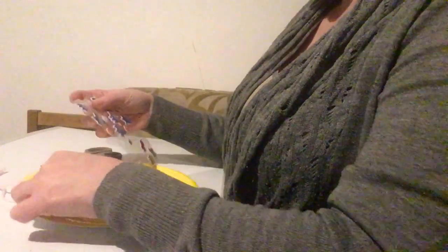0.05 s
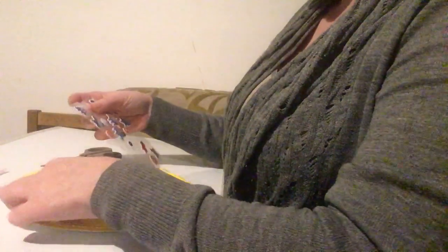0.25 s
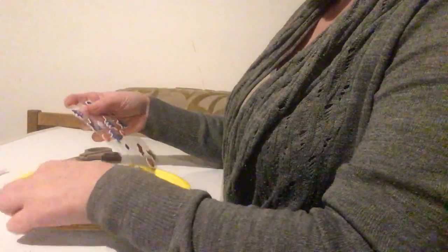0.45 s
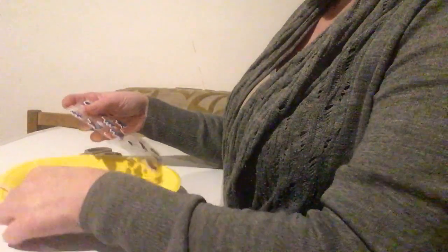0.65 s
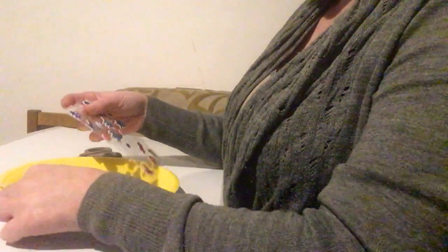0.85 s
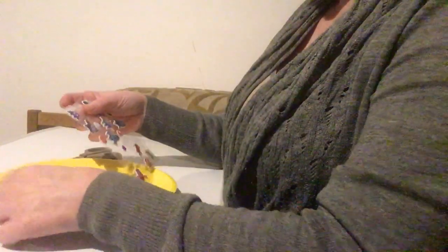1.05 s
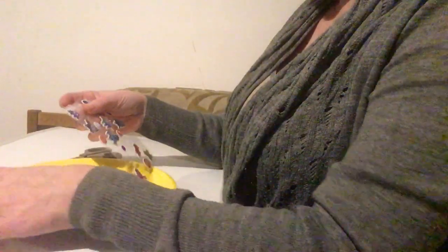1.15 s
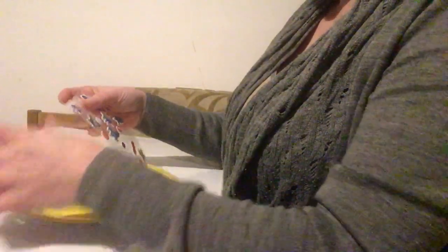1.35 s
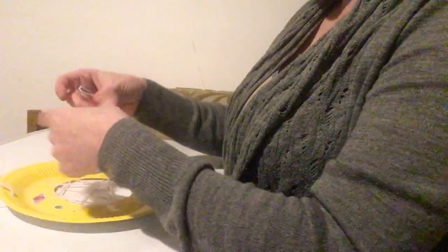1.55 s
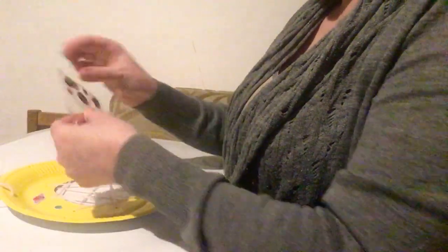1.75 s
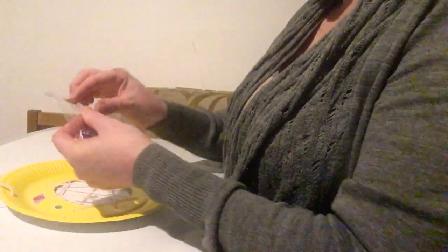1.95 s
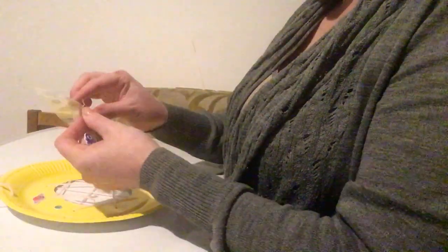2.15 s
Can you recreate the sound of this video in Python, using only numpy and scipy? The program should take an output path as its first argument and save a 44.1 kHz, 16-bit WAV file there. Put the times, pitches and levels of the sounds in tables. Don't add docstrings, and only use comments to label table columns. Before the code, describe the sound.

Stickers peeling and snapping off fingers onto a paper plate, then a thin plastic sheet crinkling

```python
import sys
import numpy as np
from scipy import signal
from scipy.fft import rfft, irfft
from scipy.io import wavfile
from scipy.ndimage import uniform_filter1d, map_coordinates

SR = 44100
rng = np.random.default_rng(int(sys.argv[2]) if len(sys.argv) > 2 else 0)


def generate_wav(signal):
    frames = np.transpose(np.atleast_2d(signal))
    scaled = np.clip(frames, -1, 1) * 32767
    pcm = np.round(scaled).astype(np.int16)
    wavfile.write(sys.argv[1], SR, pcm)


def voltage_ratio(level):
    return 10 ** (np.asarray(level, float) / 20)


N = 96579

# (frequency [Hz], level [dB per Hz])
SNAP_COLOUR = [(500, -25), (1300, -21), (2600, 6), (3760, 3), (4800, 1), (5880, 3.5), (8660, -6),
               (11600, 0.5), (16500, -14)]
# (delay [s], level [dB], pitch [Hz])
SNAP_ECHOES = [(-.004, -40, 7000), (-.002, -30, 5000), (-.0007, -22, 6000), (.0041, -19, 6500),
               (.0062, -22, 12000), (.0091, -18, 3600), (.0104, -14, 8500), (.0154, -20, 11000),
               (.0163, -17, 8500), (.0255, -16, 12000), (.04, -23, 9500)]
# (time [s], peak [dB], pitch [Hz])
GLUE_TICKS = [(0.0096, -39.5, 5930), (0.06, -39.5, 6600), (0.12, -56, 7110), (0.1445, -39.5, 8000),
              (0.186, -41.5, 5300), (0.2358, -48, 4100), (.2398, -52, 4150), (0.2888, -47.5, 4030),
              (0.3866, -44, 5230), (0.5925, -36, 6760), (0.6208, -30.5, 4770), (.6212, -34.5, 9800),
              (0.793, -61, 4500), (0.8415, -43, 10100), (1.3196, -43, 6150), (1.3562, -53, 5500),
              (1.376, -51, 6950)]
# (time [s], peak [dB], pitch [Hz])
SHEET_FLICKS = [(1.6325, -43, 6100), (1.643, -43, 7360), (1.662, -41, 6640), (1.6665, -39, 5100),
                (1.667, -37.5, 10300), (1.677, -45, 11100), (1.6785, -35, 4640), (1.702, -27.5, 6500),
                (1.7085, -29.5, 9500), (1.71, -30, 6660), (1.8645, -32, 8550), (1.872, -52, 13000),
                (1.983, -55, 6940), (2.01, -42.5, 6960), (1.995, -43.5, 4300), (1.9955, -48, 8900),
                (2.0162, -42.5, 6950), (2.0635, -42, 6560), (2.078, -53, 7500), (2.122, -53, 4300),
                (2.1355, -44, 9200), (2.1523, -37, 5400)]
# (time [s], peak [dB], pitch [Hz], t60 [s])
PLATE_POPS = [(0.001, -53.5, 960, 0.076), (0.011, -50, 930, 0.03), (0.056, -52, 2400, 0.027),
              (0.1443, -46.5, 1260, 0.0066), (0.186, -43, 1480, 0.0063), (0.1995, -46, 960, 0.021),
              (0.236, -52, 547, 0.0091), (0.24, -60, 600, 0.0072), (0.289, -49.5, 770, 0.013),
              (0.387, -56, 720, 0.0065), (0.5925, -45, 1900, 0.034), (0.6208, -27.5, 1810, 0.0037),
              (0.623, -43, 760, 0.022), (0.629, -41, 2340, 0.031), (0.84, -36, 1760, 0.011),
              (0.843, -46, 1800, 0.069), (0.907, -54.5, 980, 0.016), (1.076, -34, 2300, 0.023),
              (1.123, -47.5, 1060, 0.027), (1.136, -47, 840, 0.061), (1.3208, -50.5, 1040, 0.017),
              (1.3565, -35.5, 2000, 0.024)]
# (time [s], peak [dB], pitch [Hz], t60 [s])
MORE_POPS = [(0.621, -31, 3300, 0.0085), (.842, -43.5, 1020, 0.065), (.0096, -46.5, 2750, 0.01),
             (0.599, -49, 965, 0.035), (1.034, -32.5, 1220, 0.0097), (1.0341, -43.5, 345, 0.012),
             (1.033, -17, 3620, 0.014), (1.3562, -43, 3660, 0.014), (1.358, -49, 870, 0.029),
             (1.835, -42.5, 3340, 0.014), (1.846, -44.5, 3520, 0.024)]
# (time [s], peak [dB], pitch [Hz])
SHEET_POPS = [(1.608, -47.5, 1120), (1.632, -46, 2620), (1.642, -45.5, 1460), (1.661, -45.5, 1120),
              (1.666, -39, 1930), (1.691, -35.5, 1970), (1.701, -31, 2620), (1.7074, -31.5, 1630),
              (1.726, -37.5, 1140), (1.782, -43, 1320), (1.835, -35.5, 2080), (1.845, -41, 2120),
              (1.9736, -50, 1920), (2.004, -45.5, 1840), (2.008, -38, 1860), (2.015, -39, 1820),
              (2.0209, -36.5, 1840), (2.033, -35, 2000), (2.0344, -38, 1900), (2.1106, -47, 1750),
              (2.1306, -44.5, 1460), (2.152, -42, 1740)]
# (time [s], level [dB])
BEND_LEVEL = [(0, -58.5), (.06, -75.5), (.27, -65.5), (.33, -73), (.6, -69.5), (.8, -79), (.9, -70),
              (1.0, -72), (1.6, -76), (1.61, -64), (1.66, -61.5), (1.7, -43.5), (1.75, -54), (1.82, -64),
              (1.99, -69), (2.02, -50.5), (2.08, -63), (2.19, -64)]
# (time [s], level [dB])
FIZZ_LEVEL = [
    (1.62, -76),
    (1.66, -54.5),
    (1.705, -47),
    (1.74, -60.5),
    (1.85, -95),
    (2.0, -81),
    (2.03, -65.5),
    (2.19, -72),
]
# (frequency [Hz], level [dB per Hz])
FILM_COLOUR = [(180, -4), (300, -22), (1900, 0.5), (2790, -7.5), (6410, -14), (8500, -35), (9390, -20),
               (16000, -76)]
# (time [s], peak [dB], pitch [Hz], t60 [s])
FILM_RUBS = [(.199, -43.5, 1970, 0.025), (.208, -61, 970, .03), (.268, -44.5, 2030, 0.039),
             (0.297, -54, 2000, 0.026), (0.793, -50.5, 1860, .04), (.8, -52, 1020, 0.17),
             (.836, -44, 1740, 0.045), (1.122, -47.5, 1770, 0.17), (1.14, -55, 520, .1),
             (1.69, -49, 510, 0.15), (1.74, -57.5, 600, 0.16), (1.867, -50, 8900, 0.11),
             (.527, -58, 1920, .03), (1.372, -48, 1300, 0.028), (1.386, -54, 2400, 0.033),
             (1.687, -43, 3770, 0.042), (1.696, -42, 2200, 0.026), (1.908, -47, 2000, 0.036),
             (1.911, -55, 6200, .05), (1.931, -50.5, 1200, 0.028), (1.932, -53, 5040, 0.024),
             (2.007, -46.5, 950, 0.11), (2.054, -47.5, 3930, .04), (2.055, -51, 475, 0.016),
             (2.082, -48, 1770, 0.025), (2.094, -53, 840, .04)]
# (time [s], level [dB])
SLIDE_LEVEL = [(0, -100), (.1, -83), (.2, -70), (.28, -62.5), (.35, -76.5), (.43, -72.5), (.5, -61.5),
               (.6, -63), (.7, -82), (.725, -61.5), (.78, -64.5), (.86, -69.5), (.9, -79), (1.25, -89),
               (1.285, -69), (1.4, -75.5), (2.19, -84)]
# (frequency [Hz], level [dB per Hz])
SKIN_COLOUR = [(880, -92), (1500, -34), (2800, 4), (4730, -1), (6430, 7), (6960, 5), (12100, -0.5),
               (16000, -7.5)]
# (time [s], peak [dB], pitch [Hz])
TABLE_THUDS = [(.005, -53, 118), (0.057, -51.5, 122), (0.138, -60, 109), (0.28, -65, 126),
               (0.878, -51.5, 180), (.914, -50, 126), (0.989, -55.5, 168), (1.033, -40.5, 195),
               (1.046, -45, 183), (1.125, -45, 159), (1.137, -51.5, 195), (1.153, -49, 152),
               (1.397, -54.5, 120)]
# (frequency [Hz], t60 [s])
ROOM_DECAY = [(150, 0.15), (1000, 0.3), (3000, 0.36), (7000, 0.3), (14000, 0.25)]
# (frequency [Hz], level [dB])
ROOM_COLOUR = [(150, 5), (1000, -6), (3000, -8), (7000, -3.5), (14000, 2)]
# (frequency [Hz], level [dB per Hz])
AIR_COLOUR = [(18, -34), (30, 38), (115, 7), (374, 4.5), (2010, -9), (4780, -22), (9460, -13.5),
              (13000, -20), (16000, -38)]


def snap():
    snap_s, snap_db = 1.0325, -7.5
    crack = bursts([snap_s, snap_s + 0.0006], [snap_db, snap_db - 10],
                   lambda f: voltage_ratio(along(SNAP_COLOUR, f)), [0.0015, 0.0095], 0.000094, size=1024, kick=2.2)
    body = buckles([snap_s + 0.0013], [-38.5], [600], 0.014)
    delay, db, hz = np.transpose(SNAP_ECHOES)
    echoes = bursts(snap_s + delay, snap_db + db, hump(hz, octaves=0.5, skirt_db=-10),
                    0.0018, 0.0001, size=1024, kick=2.1)
    times, levels_db = np.array([snap_s, snap_s]), np.array([2.5, -26.5])
    pitches_hz, t60_s = np.array([7430, 12500]), np.array([0.0007, 0.0005])
    pings = rings(times, levels_db, pitches_hz, t60_s, 0.00002, size=256)
    return crack + body + echoes + room(pings)


def ticks(rows):
    s, db, hz = np.transpose(rows)
    return bursts(s, db, hump(hz, octaves=0.37, skirt_db=-5), 0.0079, 0.00028, size=1024, kick=3)


def buckles(s, db, hz, t60):
    return bursts(s, db, hump(hz, octaves=0.27, skirt_db=-13), t60, 0.00079, size=4096, kick=5.5)


def plate():
    return buckles(*np.transpose(np.vstack([PLATE_POPS, MORE_POPS])))


def sheet():
    s, db, hz = np.transpose(SHEET_POPS)
    return buckles(s, db, hz, 0.022) + crinkle()


def crinkle():
    film_db = -4
    texture = grains(1850, count=1800) + voltage_ratio(film_db) * hiss(FILM_COLOUR, patchy_db=6.0)
    bent = voltage_ratio(curve(BEND_LEVEL) + 1.53 * wobble(39.7)) * texture
    fizz = voltage_ratio(curve(FIZZ_LEVEL)) * grains(6140, count=3000)
    return bent + fizz


def grains(centre_hz, count):
    spread, scatter_db, cycles = 0.49, 4, 3.04
    s = rng.uniform(0, N / SR, count)
    hz = np.clip(centre_hz * np.exp(spread * rng.standard_normal(count)), 800, 15000)
    db = scatter_db * np.clip(rng.standard_normal(count), -2, 2)
    return unit(rings(s, db, hz, 3 * cycles / hz, 0.00004, size=600))


def rubs():
    s, db, hz, t60 = np.transpose(FILM_RUBS)
    return bursts(s, db, hump(hz, octaves=0.28, skirt_db=-11.5), t60, 0.0027, size=4096, kick=0)


def slide():
    return voltage_ratio(curve(SLIDE_LEVEL) + 0.8 * wobble(20)) * hiss(SKIN_COLOUR, patchy_db=0.6)


def thuds():
    s, db, hz = np.transpose(TABLE_THUDS)
    return bursts(s, db, hump(hz, octaves=0.57, skirt_db=-12.5), 0.039, 0.0012, size=8192, kick=2.9)


def room(x):
    room_db, gap_s = -3.5, 0.0079
    hz, t, z = signal.stft(rng.standard_normal(SR // 2), SR, nperseg=256)
    decay_db = along(ROOM_COLOUR, hz)[:, None] - 60 * t / along(ROOM_DECAY, hz)[:, None]
    tail = signal.istft(z * voltage_ratio(decay_db), SR, nperseg=256)[1]
    tail = tail * (1 - np.exp(-(np.arange(len(tail)) / SR / gap_s) ** 2))
    return voltage_ratio(room_db) * signal.fftconvolve(x, tail / np.linalg.norm(tail))[:N]


def air():
    return voltage_ratio(-68.5 + 0.5 * wobble(6)) * hiss(AIR_COLOUR, patchy_db=0.8)


def bursts(s, db, colour, t60, rise, size, kick):
    t = np.arange(size) / SR
    decay = voltage_ratio(-60 * t / np.reshape(t60, (-1, 1)))
    force = rng.standard_normal((len(s), size)) * decay * (1 - np.exp(-t / rise))
    force += kick * (t == 0)
    response = causal(colour(np.fft.rfftfreq(size, 1 / SR)), size)
    wave = irfft(rfft(force) * response, size)
    return place(np.asarray(s), wave * (voltage_ratio(db) / np.abs(wave).max(axis=1))[:, None])


def rings(s, db, hz, t60, rise, size):
    t = np.arange(size) / SR
    decay = voltage_ratio(db[:, None] - 60 * t / t60[:, None])
    return place(s, decay * np.sin(2 * np.pi * hz[:, None] * t) * (1 - np.exp(-t / rise)))


def place(s, wave):
    size = wave.shape[1]
    start = np.round(np.clip(s, 0, N / SR) * SR).astype(int)
    at = start[:, None] + np.arange(size)
    return np.bincount(at.ravel(), wave.ravel(), N + size + 1)[:N]


def hump(hz, octaves, skirt_db):
    def colour(f):
        away = np.log2((f + 1) / np.asarray(hz)[:, None]) / octaves
        return np.exp(-0.5 * away ** 2) + voltage_ratio(skirt_db) * np.exp(-0.5 * (away / 3) ** 2)
    return colour


def causal(gain, size):
    cepstrum = irfft(np.log(gain + 1e-4), size)
    cepstrum[..., 1:size // 2] *= 2
    cepstrum[..., size // 2 + 1:] = 0
    return np.exp(rfft(cepstrum))


def hiss(spectrum, patchy_db):
    hz, _, z = signal.stft(rng.standard_normal(N + 1024), SR, nperseg=512)
    field = uniform_filter1d(rng.standard_normal(z.shape), size=6, axis=0)
    field = uniform_filter1d(field, size=5, axis=1)
    colour_db = np.where(hz < spectrum[0][0], -120, along(spectrum, hz))
    patches = voltage_ratio(colour_db[:, None] + patchy_db * unit(field))
    return unit(signal.istft(z * patches, nperseg=512)[1][:N])


def wobble(rate):
    knots = rng.standard_normal(int(N * rate / SR) + 4)
    return map_coordinates(knots, [np.arange(N) * rate / SR])


def curve(rows):
    return np.interp(np.arange(N) / SR, *np.transpose(rows))


def along(points, hz):
    f, v = np.transpose(points)
    return np.interp(np.log(hz + 1), np.log(f + 1), v)


def unit(x):
    return x / np.sqrt(np.mean(x ** 2) + 1e-20)


def scene():
    sends = [(ticks(GLUE_TICKS), -3.5), (ticks(SHEET_FLICKS), -9), (plate(), -2), (sheet() + rubs(), -2)]
    close = snap() + slide() + thuds()
    for sound, send_db in sends:
        close = close + sound + voltage_ratio(send_db) * room(sound)
    close = signal.sosfilt(signal.butter(2, 60, "high", fs=SR, output="sos"), close)
    return (close + air())[None]


def top_cut(x):
    return signal.sosfilt(signal.butter(12, 17080, fs=SR, output="sos"), x)


def record(dry):
    top_hz, edge_hz, top_db = 15900, 130, -34
    hz = np.fft.rfftfreq(N, 1 / SR)
    shelf_db = top_db * (1 + np.tanh((hz - top_hz) / edge_hz)) / 2
    mix = irfft(rfft(dry) * voltage_ratio(shelf_db), N)
    return top_cut(mix)


dry = scene()
out = record(dry)
generate_wav(out)
```